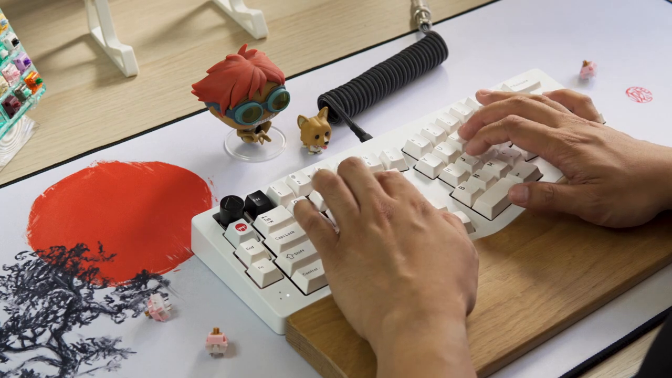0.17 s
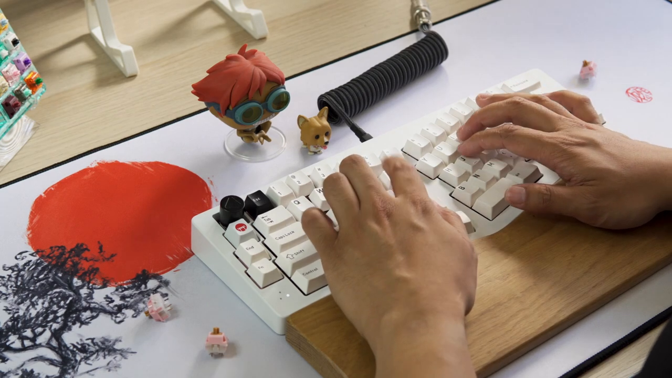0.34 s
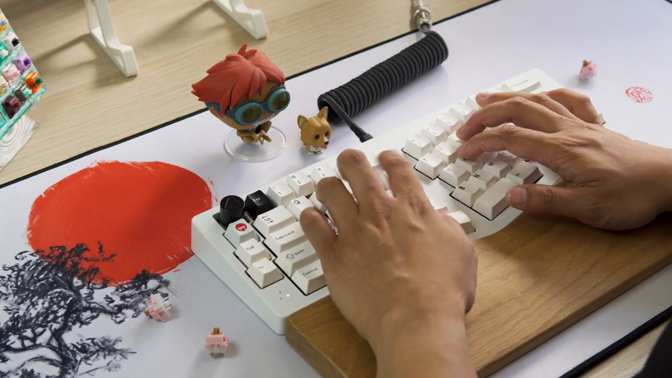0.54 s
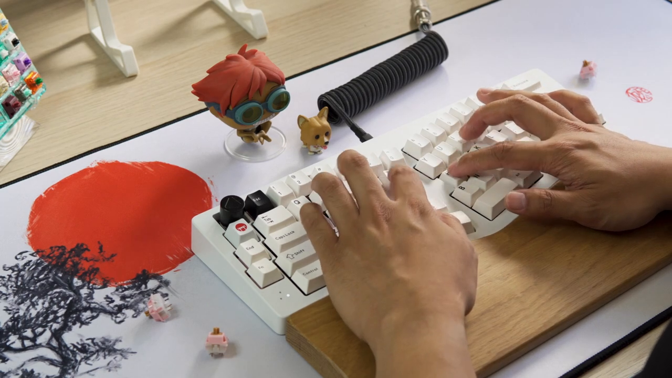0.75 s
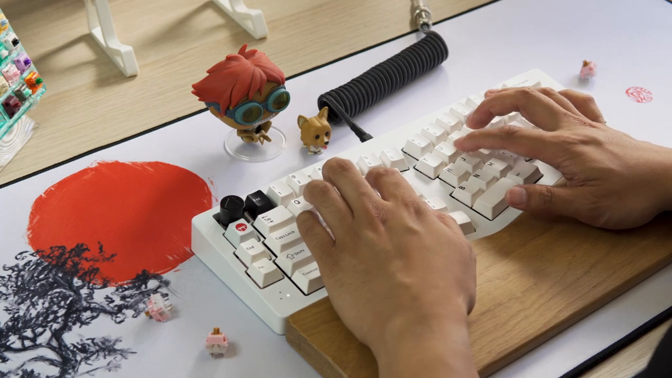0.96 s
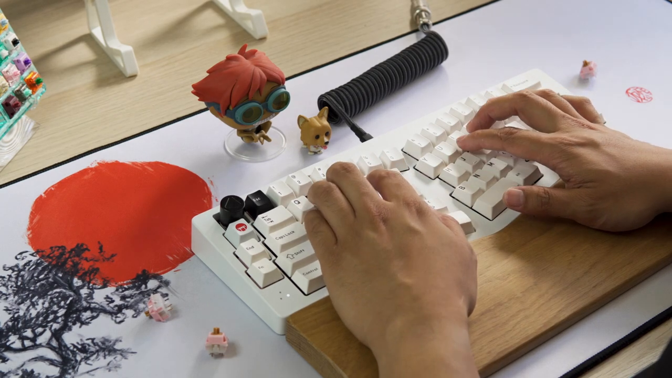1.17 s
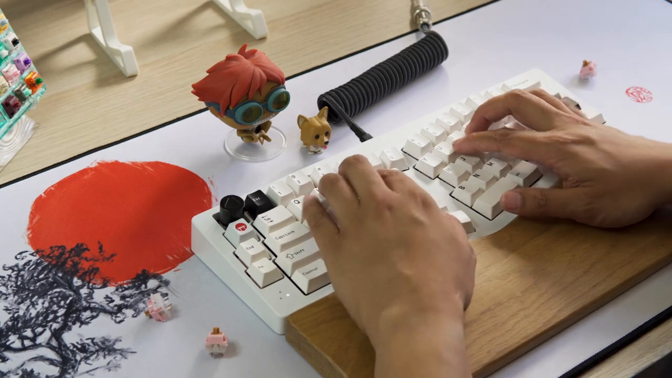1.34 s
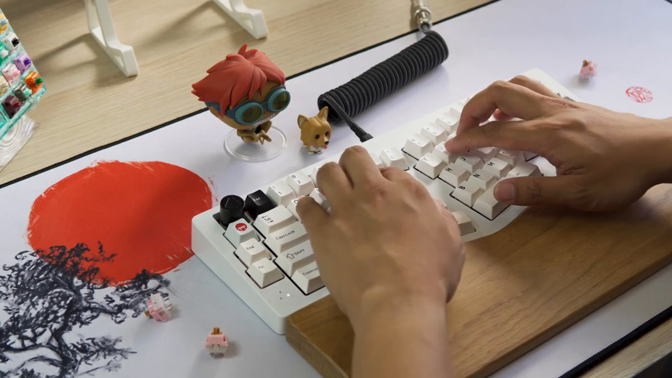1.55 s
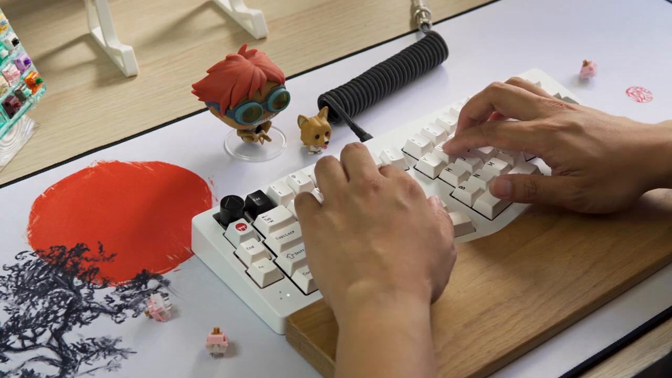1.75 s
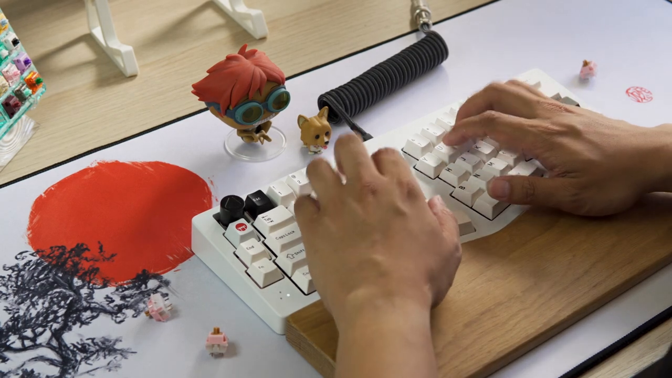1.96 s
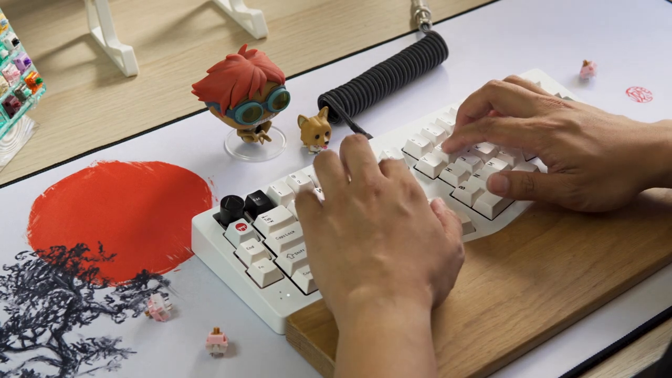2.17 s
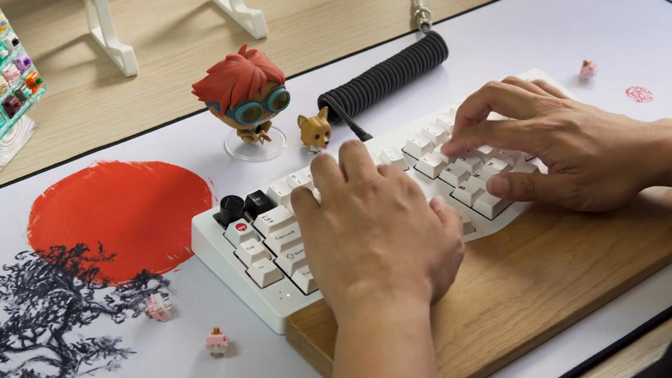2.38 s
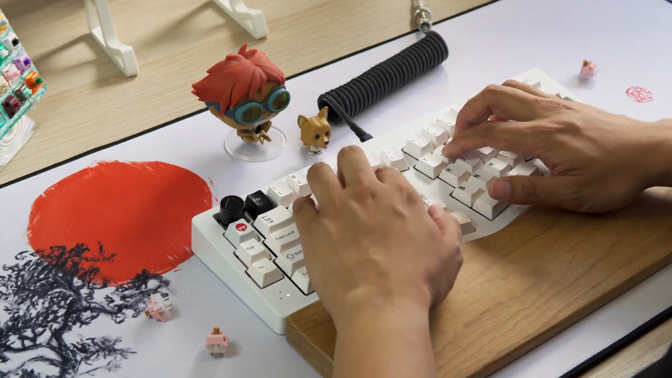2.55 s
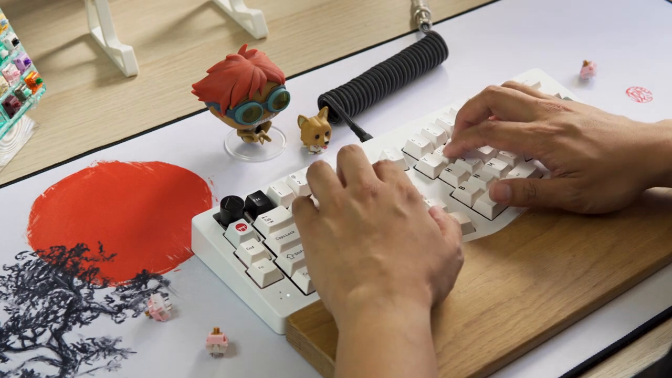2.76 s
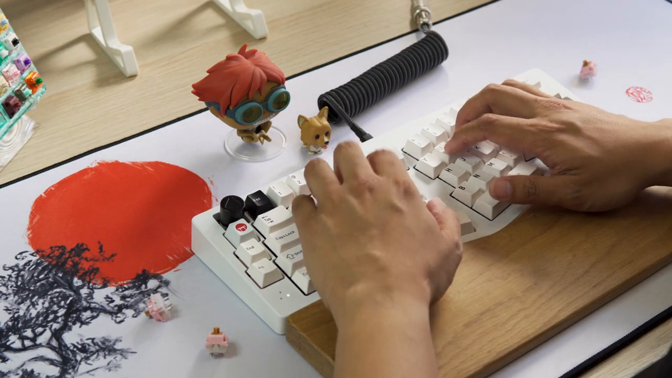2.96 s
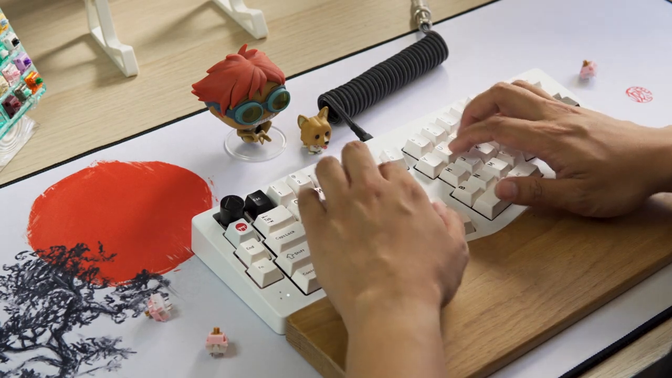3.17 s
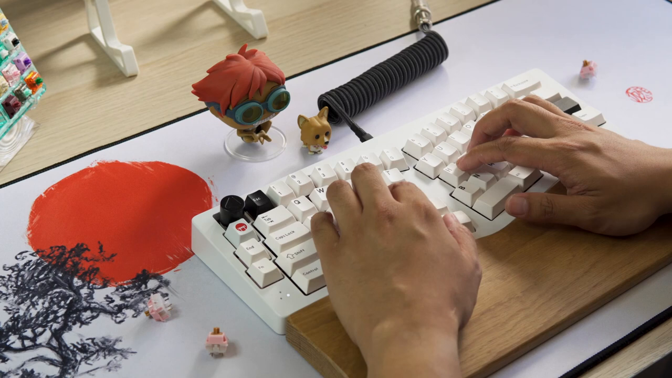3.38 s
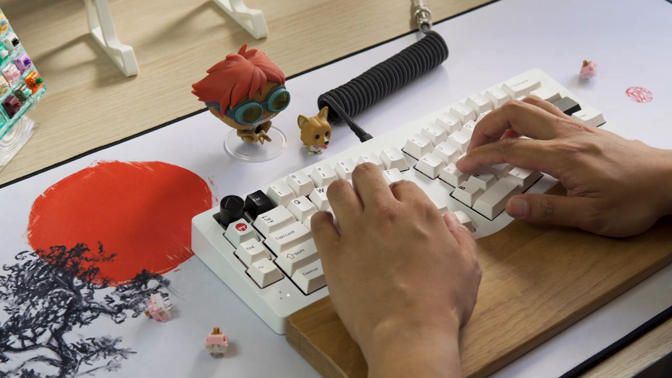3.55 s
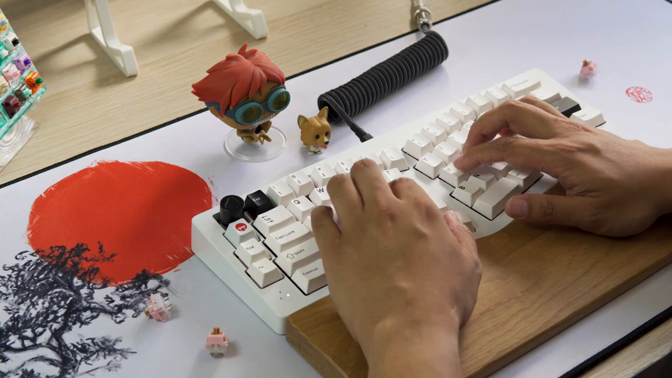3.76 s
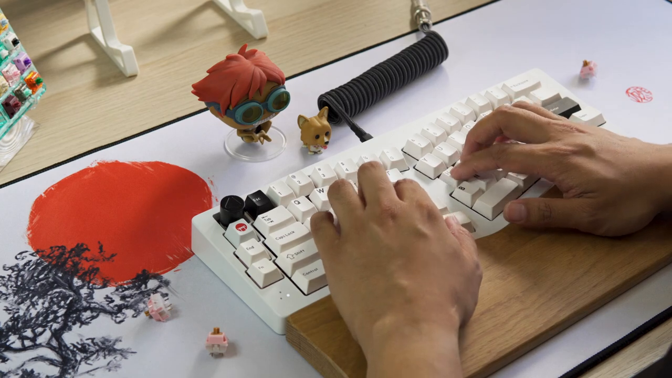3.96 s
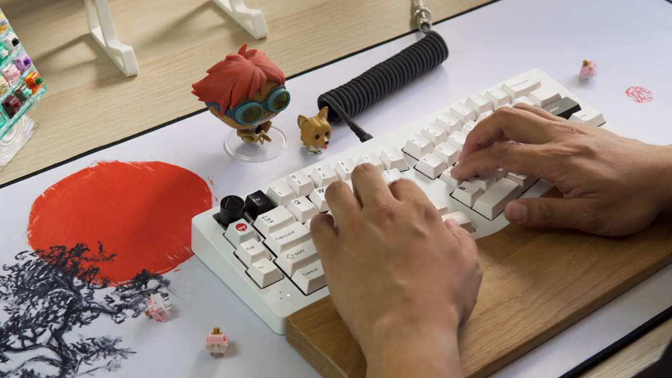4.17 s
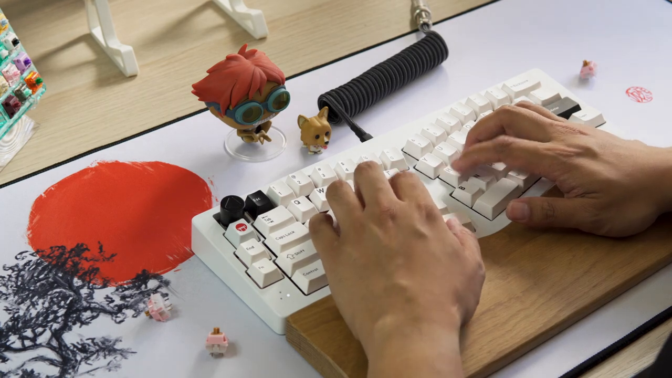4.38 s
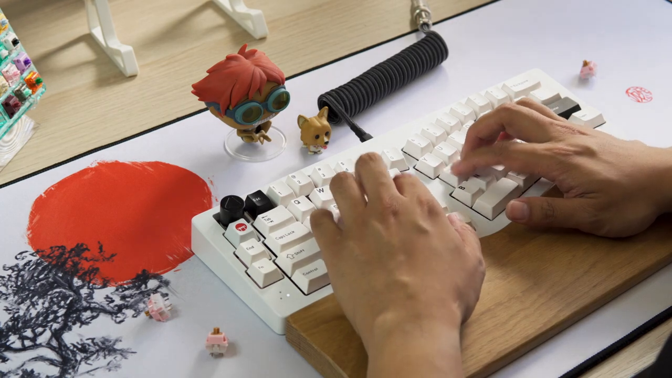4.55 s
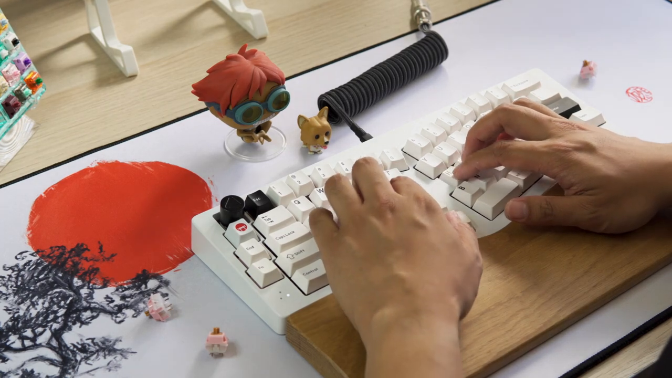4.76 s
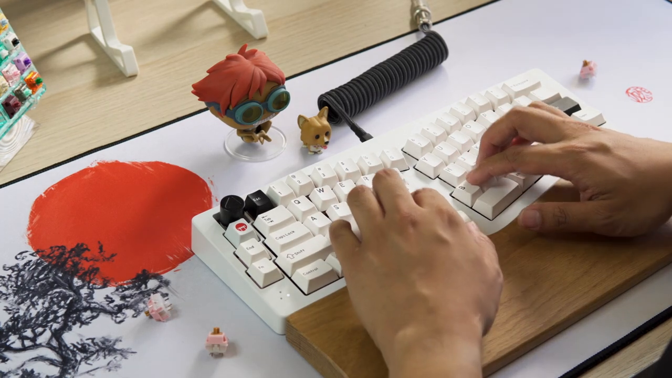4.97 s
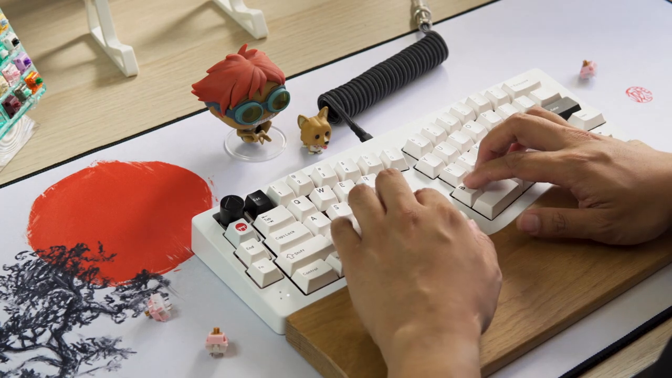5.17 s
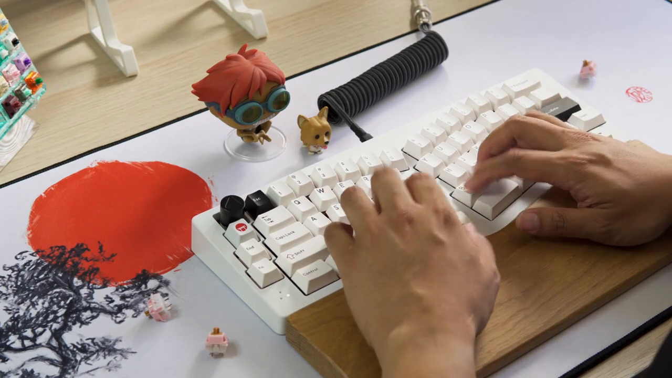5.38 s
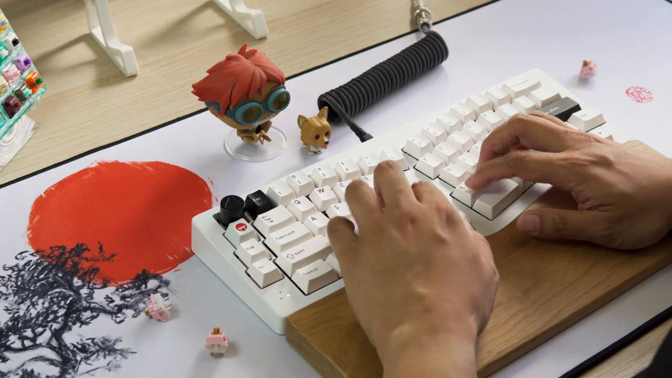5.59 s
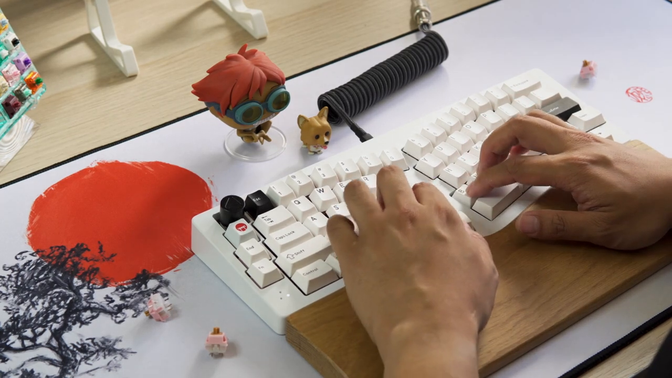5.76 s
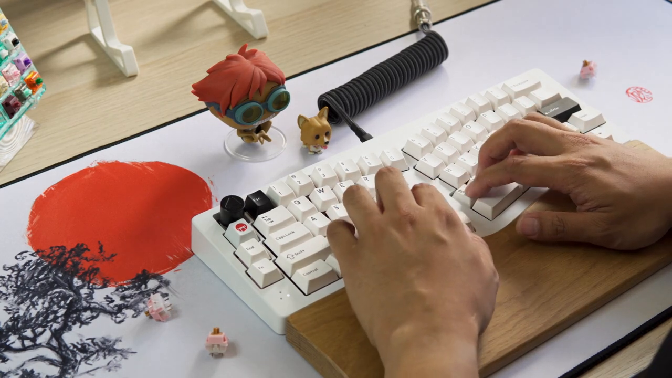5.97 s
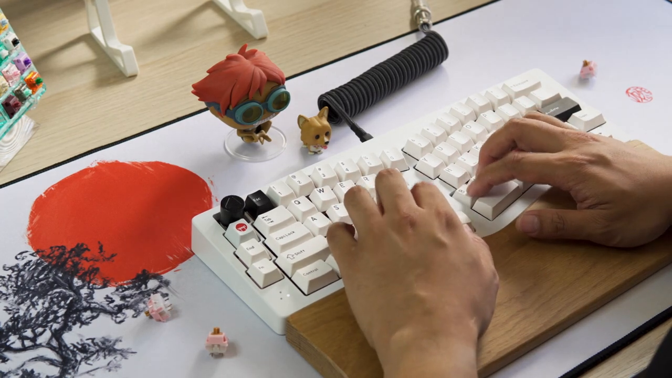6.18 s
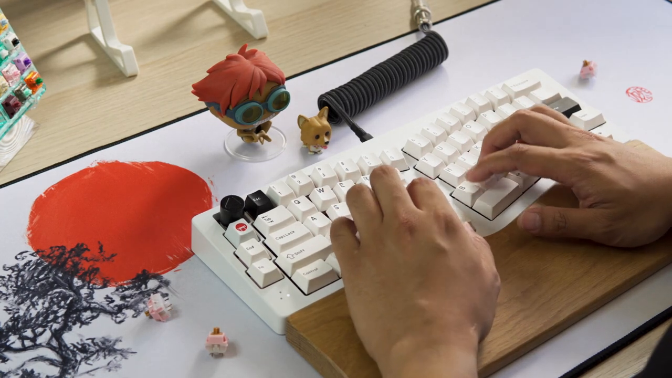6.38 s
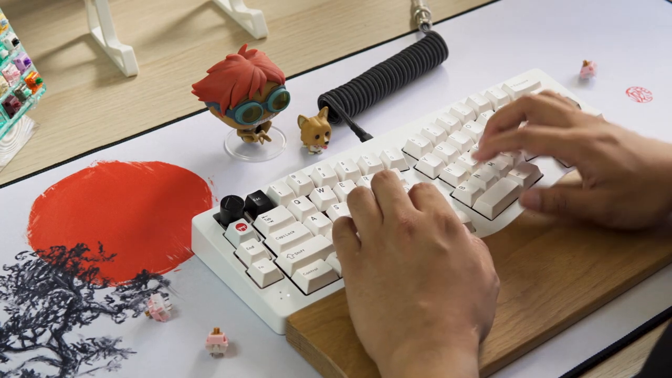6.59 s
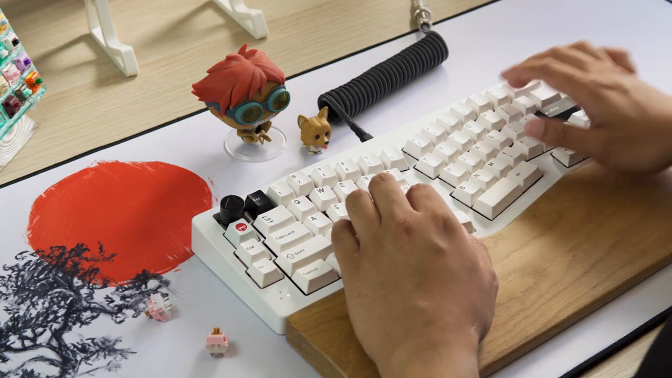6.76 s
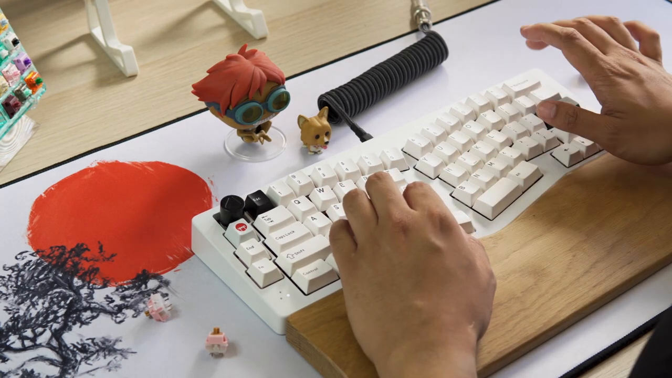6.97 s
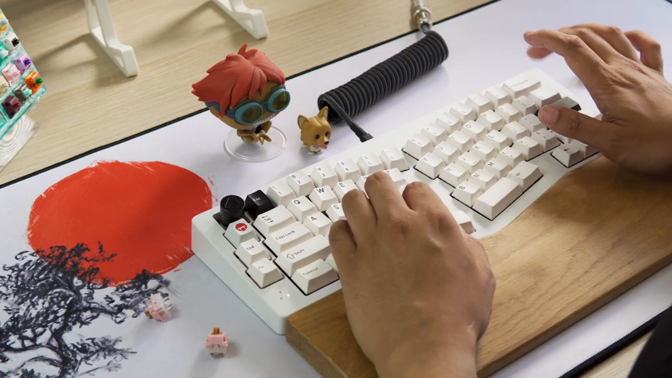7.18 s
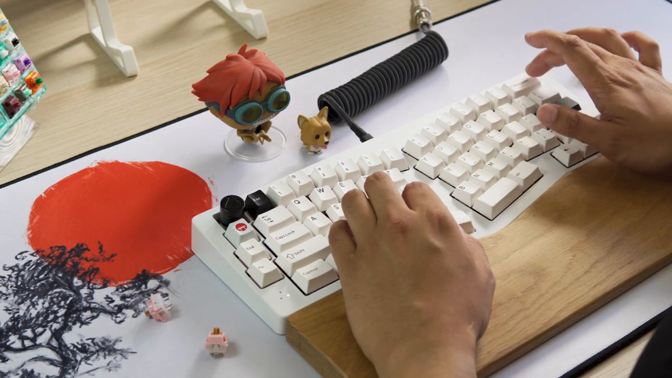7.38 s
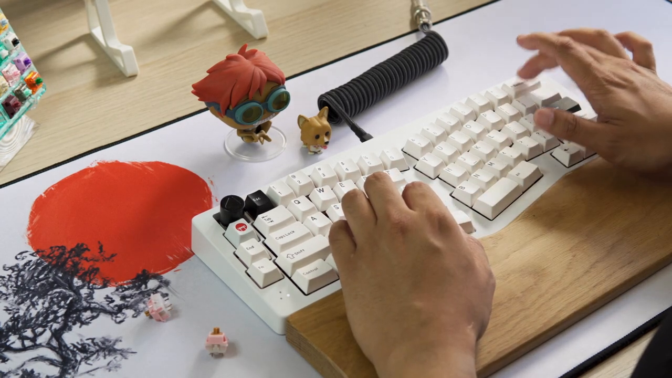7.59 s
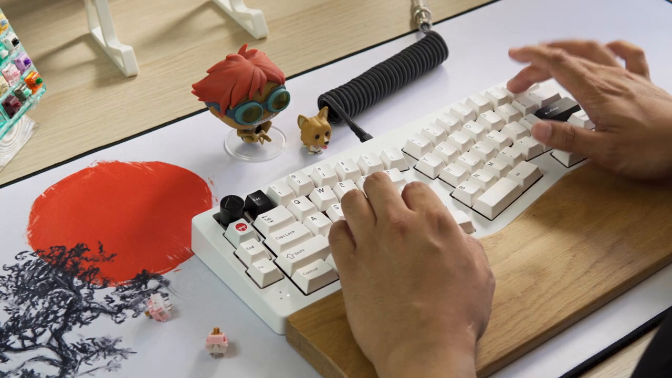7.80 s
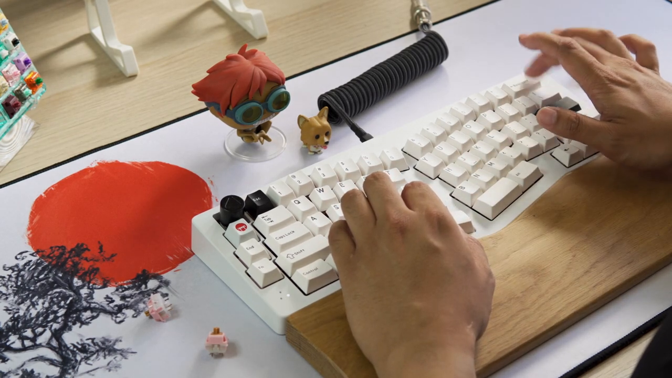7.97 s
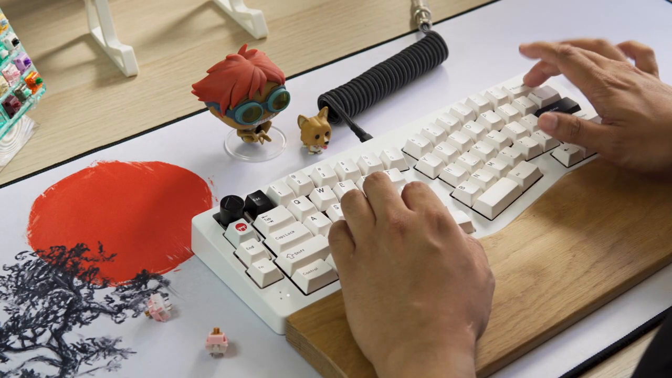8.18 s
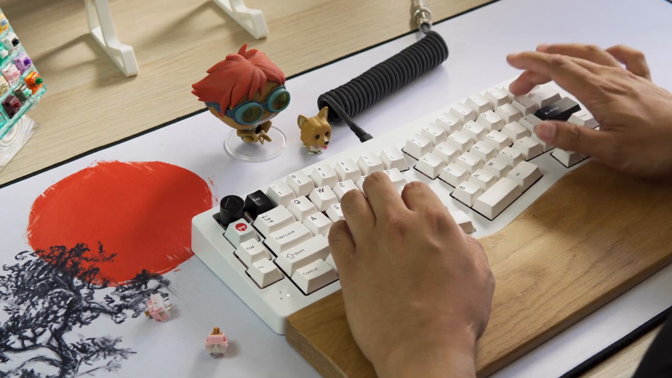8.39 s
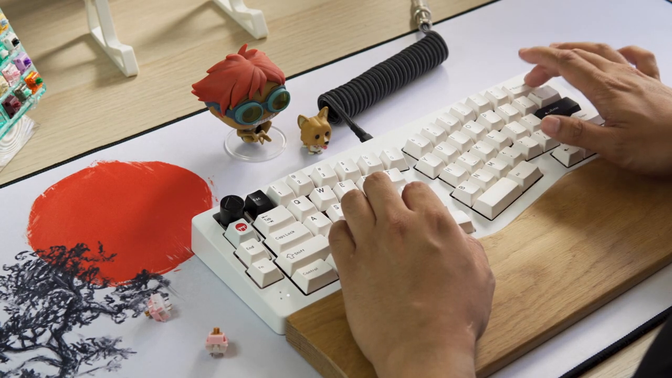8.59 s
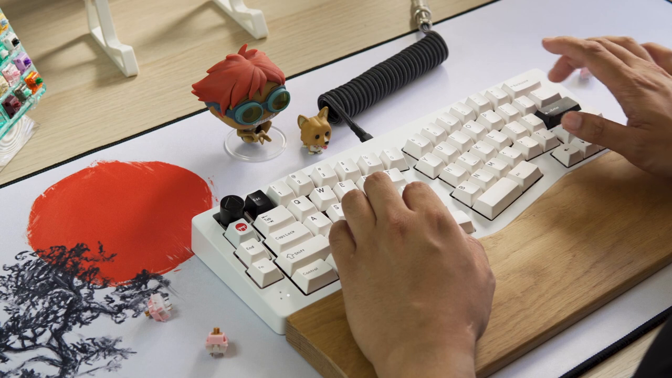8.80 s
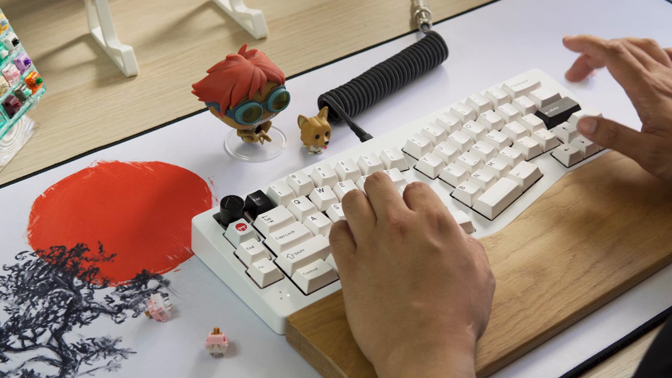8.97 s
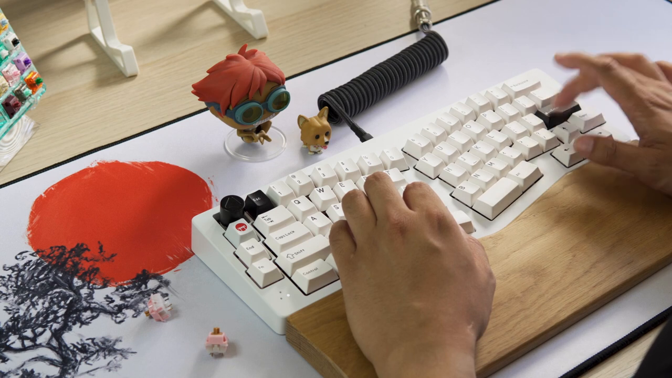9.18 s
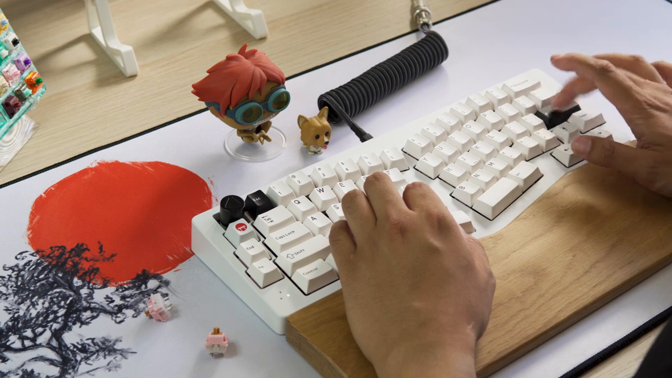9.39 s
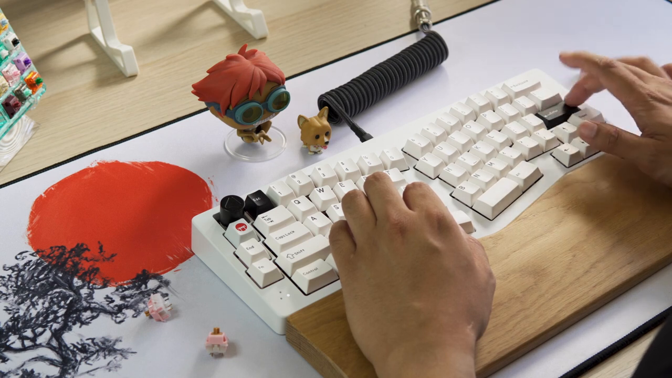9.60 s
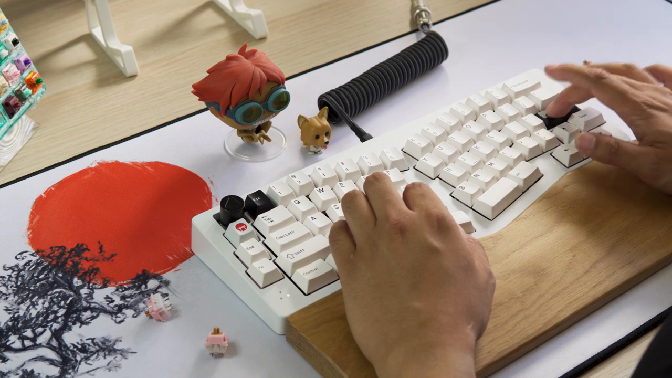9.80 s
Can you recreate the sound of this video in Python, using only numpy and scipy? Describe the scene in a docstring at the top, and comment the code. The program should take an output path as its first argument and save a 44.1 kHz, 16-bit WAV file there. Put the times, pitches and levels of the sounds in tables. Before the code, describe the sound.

Rapid typing on a mechanical keyboard in four dense bursts with short pauses, then evenly repeated single-key taps, heard close in a quiet small room.

```python
"""Fast typing in a small quiet room

One microphone close to a mechanical keyboard on a desk: four runs of letters, then repeated taps on a dull
and a bright editing key. Each key clacks going down and coming up, as damped resonances of keycap, plate
and switch, with a noise tail for the room. Firm strokes ring the low modes of the desk and sway its top,
a hand slides in a pause as swelling noise, and coloured noise with faint hum tones is the room air."""
import sys
import numpy as np
from scipy import signal
from scipy.fft import rfft, irfft
from scipy.io import wavfile
from scipy.ndimage import uniform_filter1d

SR = 44100
rng = np.random.default_rng(int(sys.argv[2]) if len(sys.argv) > 2 else 0)


def persist_wave(psi):
    """Save psi, clipped to +-1, as 16-bit WAV."""
    counts = np.round(np.clip(psi, -1, 1) * 32767).astype(np.int16)
    wavfile.write(sys.argv[1], SR, np.atleast_2d(counts).T)


N = 433944
TIME = np.arange(N) / SR


def amp(db):
    """Decibels to gain."""
    return np.exp(np.asarray(db) * np.log(10) / 20)


def add(track, s, sound):
    """Mix a sound into the track from time s, cutting what falls outside."""
    i = int(round(s * SR))
    sound = sound[max(-i, 0):max(N - i, 0)]
    track[max(i, 0):max(i, 0) + len(sound)] += sound


def coloured(x, points):
    """The sound weighted by a spectrum of (hz, level_db) points, joined over log frequency."""
    hz, db = np.transpose(points)
    f = np.maximum(np.fft.rfftfreq(len(x), 1 / SR), 1)
    gain = amp(np.interp(np.log(f), np.log(hz), db))
    return irfft(rfft(x) * gain, len(x))


def noise(points, size=N):
    """Noise of rms 1 with a spectrum of (hz, level_db) points."""
    y = coloured(rng.standard_normal(size), points)
    return y / y.std()


def unit(y):
    """The same sound with energy 1."""
    return y / np.sqrt(np.sum(y ** 2))


def ring(modes, scatter, size=11025):
    """Struck (hz, level_db, t60_s) modes as decaying sines, slightly detuned by the place of the blow."""
    t = np.arange(size) / SR
    hz, db, t60 = np.transpose(modes)[:, :, None]
    pitch = hz * (1 + scatter * rng.standard_normal(hz.shape))
    return np.sum(amp(db - 60 * t / t60) * np.sin(2 * np.pi * pitch * t), axis=0)


# spectrum of the still room air at the microphone: hz, level_db (relative)
AIR_SPECTRUM = [(15, -31), (25, -1), (59, -1.5), (87, -17.5), (123, -13), (206, -16), (242, -17.5),
                (545, -24.5), (887, -26), (1160, -32.5), (3820, -37.5), (4490, -43.5), (16000, -50)]
# faint hum of the room, before the gain hum_db: hz, level_db (rms)
HUM_TONES = [(120, -83.5), (140, -80.5), (241, -79.5), (603, -94), (3881, -96.5)]


def background(air_db, hum_db):
    """Still room air as coloured noise, with faint hum tones whose phases wander slightly."""
    hum = 0
    for hz, db in HUM_TONES:
        wander = np.cumsum(rng.standard_normal(N)) * .015  # radians
        hum = hum + np.sqrt(2) * amp(db) * np.sin(2 * np.pi * hz * TIME + wander)
    return amp(air_db) * noise(AIR_SPECTRUM) + amp(hum_db) * hum


# spectrum of a fingertip on a key: hz, level_db (relative)
FINGERTIP_SPECTRUM = [(500, -6.5), (1500, 0.5), (2600, 5), (4800, -6.5), (7000, -17), (10500, -11),
                      (15000, -45.5)]


def scuff(travel_s):
    """A fingertip lands and the stem slides down the switch: a short swell of coloured noise."""
    window = np.hanning(int(travel_s * SR))
    return unit(noise(FINGERTIP_SPECTRUM, size=len(window)) * window)


LEAD_IN_S = .001
# where plate, keycap, hard edge and switch ping lie in the spectrum: hz
PART_PITCHES = [1300, 2500, 4500, 10000]


def clack(modes, stroke, spread, blur, size=1024):
    """One blow on a key, after the lead-in: damped resonances, detuned by spread and widened by blur."""
    level_db, cap_hz, plate_db, edge_db, ping_db = stroke
    f = np.maximum(np.fft.rfftfreq(size, 1 / SR), 1)
    t = np.arange(size) / SR
    body = 0
    for k, (hz, width, db) in enumerate(modes):
        lag = 0
        if k == 2:
            hz = cap_hz
        elif hz < 6000:
            # each key sits on its own spot of the plate and rings a little differently
            hz = hz * (1 + spread * rng.standard_normal())
        else:
            # the highest modes keep the pitch they are given and start a random moment late, up to 0.7 ms
            lag = rng.uniform(0, .0007)
        mode = amp(db) / (1 + 1j * (f ** 2 - hz ** 2) / (f * width * blur)) ** 2
        # neighbouring modes move in opposite senses, which leaves notches between them
        body = body + (-1) ** k * mode * np.exp(-2j * np.pi * f * lag)
    # plastic on plastic adds a trace of broad crack
    crack = amp(-42) * rfft(unit(rng.standard_normal(size) * amp(-60 * t / .008)))
    colour_db = np.interp(np.log(f), np.log(PART_PITCHES), [plate_db, 0, edge_db, ping_db])
    sound = irfft((body + crack) * amp(level_db + colour_db))
    sound = np.roll(sound, int(LEAD_IN_S * SR))
    edge_fade = np.minimum(1, np.minimum(t, t[::-1]) / .0005)
    return sound * edge_fade


def chatter(sound, rattle_db):
    """The loose cap rattles on for a few milliseconds: the blow convolved with a decaying noise burst."""
    t = np.arange(len(sound)) / SR
    rattle = amp(rattle_db) * unit(rng.standard_normal(len(t)) * amp(-60 * t / .013))
    return sound + signal.fftconvolve(sound, rattle)[:len(t)]


def room(sound, decay):
    """Diffuse tail of one stroke; every key and hand position sends it along other paths."""
    return signal.fftconvolve(sound, decay * rng.standard_normal(len(decay)))


# the keyboard case under the plate: pitch_hz, level_db (relative), t60_s
CASE_RING = [(421, -2, 0.21), (507, -8, 0.11)]
# colour of the small room's tail: hz, level_db
ROOM_SPECTRUM = [(300, 1.7), (800, -2.7), (1400, 0.75), (2500, -0.35), (4000, -1), (7000, 1.1),
                 (10000, 0.9), (15000, -1)]


def keys(clacks, modes, spread, rattle_db, travel_s, gain_db, lead_db, touch_db, case_db, wet_db,
         room_t60, room_blur):
    """Each stroke: a scuff as the key travels, a light first contact, the clack, then case and room."""
    dry, wet, t = np.zeros(N), np.zeros(N), TIME[:SR // 4]
    decay = unit((1 - np.exp(-t / 0.0017)) * amp(-60 * t / room_t60))
    case = ring(CASE_RING, scatter=0)
    for s, *stroke in clacks:
        level_db, _, plate_db = stroke[:3]
        start = s - LEAD_IN_S
        sound = chatter(clack(modes, stroke, spread, blur=0.88), rattle_db)
        # the weight of the touch varies by 2 dB
        scuff_db = level_db + touch_db + 2 * rng.standard_normal()
        add(dry, s - travel_s, amp(scuff_db) * scuff(travel_s))
        add(dry, start - .0015, amp(lead_db) * sound)
        add(dry, start, sound)
        add(dry, s, amp(level_db + plate_db + case_db) * case)
        # the room hears the keyboard from all sides, so its peaks are blunter there
        add(wet, start, room(clack(modes, stroke, spread, blur=room_blur), decay))
    return amp(gain_db) * (dry + amp(wet_db) * coloured(wet, ROOM_SPECTRUM))


# a firm clack may jog a loose cap nearby, which ticks after 0.5 to 1.5 times the middle delay
JOG_ABOVE_DB, JOG_CHANCE, JOG_MID_DELAY_S = -0.5, .6, .007
JOG_LEVEL_DB, JOG_HARDNESS_DB = -14, 7
# key clacks, down and up, mostly of letter keys; the last is a fingertip landing before the dull taps:
# start_s, level_db (relative), keycap pitch_hz, plate_db, contact hardness_db
KEY_BLOWS = [(0.0096, -3.5, 2460, 5.5, 3.5), (0.045, 8, 2410, -8.5, 1.5), (0.11, -5.5, 2450, -8, -7.5),
             (0.1285, 6.5, 2260, -8.5, 0.5), (0.1389, -9, 2440, 8, -2), (0.1553, 4.5, 2630, -6, 4),
             (0.221, 6.5, 2480, -3.5, 5), (0.2567, -3.5, 2700, -5, 0.5), (0.3132, 1.5, 2670, -3.5, 6.5),
             (0.3204, -3, 2450, -5, -3), (0.3491, -4.0, 2720, -8, 3.5), (0.4271, -12, 2580, -1.5, 2),
             (0.4299, -18, 2516, -3, -2), (0.4667, 1, 2770, -15, 0), (0.4954, -0.5, 2220, -9.5, -1),
             (0.4996, -1, 2200, 2, -3), (0.5013, -3.5, 2240, 10, 1.5), (0.5578, 4, 2840, -4.5, 4.5),
             (0.5774, -12, 2270, -9.5, 5.5), (0.6149, -22, 2630, 20, 5.5), (0.6466, 4, 2530, -8.5, -6),
             (0.6874, 7.5, 2360, -5.5, 1), (0.7083, -22.5, 2330, -1.5, 1.5), (0.7197, -1, 2290, -9, -6.5),
             (0.8018, 1.5, 2430, -4, -7), (0.8117, -2, 2340, -6, -1.5), (0.9094, 0, 2160, -9, -12),
             (1.4366, -17.5, 2530, -10, -12), (1.4666, -19.5, 2650, -5, -8), (1.5284, -24.0, 2470, 13, 4),
             (1.7649, -16.5, 2620, -8, -8), (2.0045, -25.5, 2640, 0, 13), (2.0237, -23, 2790, 1, 2.5),
             (2.028, 6, 2560, -7.5, 1.5), (2.0423, -5.5, 2890, 6.5, 8), (2.0455, 6, 2358, -9, 2),
             (2.048, -6, 2967, -5.5, 5.5), (2.063, 6.5, 2435, -5, 7), (2.0893, -3, 2790, -1, 10.5),
             (2.1128, -1.5, 2560, -3.5, 5.5), (2.1354, -5, 2200, -4, -2), (2.1436, -12, 2530, 10, 7),
             (2.1617, -6.5, 2670, 2, -4), (2.1672, -4.5, 2490, -7, -2), (2.1948, -4, 2490, -5, 2.5),
             (2.2251, -2, 2420, 1.5, 3), (2.2802, 0.5, 2550, -2, 6), (2.2841, 3.5, 2303, -2, 0),
             (2.3056, -1, 2690, 2, 7.5), (2.3089, 1.5, 2538, -9, 6.5), (2.3308, -5, 2730, -3, 6.5),
             (2.351, -4.5, 2670, 0, 8), (2.3741, -8, 2460, -1, 4), (2.3926, -7, 2500, -1.5, -1),
             (2.3948, -12.5, 2624, 10, 4), (2.415, -8, 2750, -1.5, -1), (2.441, -8.5, 2190, -1.5, 6),
             (2.46, -11, 2410, 1, 0.5), (2.4672, -3.5, 2450, -4, -8.5), (2.5133, -10, 2793, -6, 3),
             (2.5163, 3.5, 2550, 1, 5), (2.524, 2, 2477, -7, 2), (2.5415, -0.5, 2950, -3, 12),
             (2.5469, -1.5, 2686, 0, -1), (2.5859, 0, 2700, 0, 8.5), (2.5983, -0.5, 2580, -1.5, 5),
             (2.632, -8.0, 2350, -5.5, -7), (2.651, -9.5, 2394, -3, 3), (2.6558, -0.5, 2270, -9, -6),
             (2.6609, -5, 2844, 0.5, 3), (2.6823, -14.5, 2380, 4, 7), (2.703, -1, 2698, -3, -4.5),
             (2.7098, -4, 2530, -2, -5), (2.7501, 5, 2620, -4.5, 2.5), (2.768, -1.5, 2900, 7.5, 7.5),
             (2.774, 4.5, 2410, -9.5, -1), (2.787, -9.0, 2940, 1.5, 15), (2.797, -3.5, 2730, -1, 7),
             (2.8102, -4.5, 2750, -1, 8), (2.8551, 2, 2527, -3, 7.5), (2.8628, -10, 2570, -2, 5.5),
             (2.8682, -1.5, 2490, -8, -8), (2.881, -3.5, 2790, 5, 1.5), (2.8963, -7, 2597, -4, -1),
             (2.9343, -12.5, 2520, -1.5, 4), (2.949, -7, 2250, 0, -3), (2.9681, -2, 2450, -6, 0),
             (2.9915, 4.5, 2550, -7.5, 2.5), (2.9976, 5, 2310, -5.5, -1), (3.0096, -5.5, 2624, 3, 7),
             (3.02, -8, 2864, -0.5, 8.5), (3.044, -3.5, 2620, -4, 4), (3.0683, -2.5, 2860, -0.5, 10),
             (3.0832, -2.5, 2520, -3, 5), (3.1372, -0.5, 2720, 2.5, -2), (3.1597, -5, 2330, -3, -3),
             (3.1638, -6, 2470, -2, -6), (3.1676, -4.0, 2260, -4, -1), (3.1783, -9.5, 2530, 3, 4),
             (3.194, -4.5, 2450, -8, -2), (3.2065, -6, 2510, -2, -2.5), (3.9173, -0.5, 2720, 2, 8.5),
             (3.9304, 2.5, 2290, -6.5, 1.5), (3.9404, 8, 2410, -7, -4), (3.9537, -4.0, 2500, -8, -0.5),
             (3.9597, 6.5, 2400, -7.5, 0), (4.004, 2, 2574, -2.5, 1), (4.039, 4.5, 2480, -6.5, 0),
             (4.051, -3, 2390, -8, -12.5), (4.0687, -8, 2370, -8, -2.5), (4.0843, 0.5, 2580, -8, -6),
             (4.1143, 3, 2350, -8, -8), (4.1307, -4.5, 2390, -5, -3), (4.1843, 0, 2833, 1, 5),
             (4.19, 8, 2540, -6, -14), (4.1975, 1.5, 2570, -8, 7.5), (4.2057, 0.5, 2533, -9, 2.5),
             (4.2412, 4, 2200, -9, -7.5), (4.2537, -3.5, 2540, -2, 7), (4.2749, -6.5, 2730, 4.5, 7),
             (4.3058, -3, 2450, -7, -12), (4.317, -4, 2450, -2, -3), (4.3235, -5.5, 2440, -7, 1),
             (4.3346, 1.5, 2420, -11, -4.5), (4.372, 7.0, 2160, -11, -9), (4.4036, -1, 2680, 1, 6),
             (4.4381, 0.5, 2570, -5, 2.5), (4.4581, 5.5, 2480, -7.5, -5), (4.461, -1, 2560, -4.5, 1.5),
             (4.4804, -2, 2420, -12.5, -15), (4.4913, -0.5, 2260, -7, -7), (4.509, 2.5, 2500, -3, 2),
             (4.5244, -9, 2560, 3, 0.5), (4.5397, -4.5, 2350, -2.5, 1), (4.5523, -4, 2470, -11, -9),
             (4.5644, -5, 2450, -7, -12), (4.5746, -3.5, 2480, -6.5, -2), (4.5801, 0.5, 2600, -11, -4),
             (4.616, -1, 2414, -5.5, -2), (4.6187, 1.5, 2340, -8.5, -8), (4.6608, 0, 2790, 1.5, 8.5),
             (4.6834, 4.5, 2530, -3, 0.5), (4.6941, 8.5, 2480, -13, -4), (4.698, 4, 2530, -8.5, 2.5),
             (4.7204, -1.5, 2550, -4, -2), (4.7269, 0, 2290, -7, -8), (4.7917, -11, 2440, 4.5, 0.5),
             (4.8307, -1.5, 2490, -6.5, -3.5), (4.8414, 8.5, 2620, -10.5, -19),
             (4.8628, -3, 2250, -3.5, -6), (4.8729, -7.5, 2290, 0, -1.5), (5.401, -29, 2600, 5.5, 4),
             (5.4312, 5.0, 2460, -0.5, -5), (5.4472, 1.5, 2600, -16, 3.5), (5.458, 3.5, 2400, -6, -6),
             (5.464, 2.5, 2500, 1.5, 7), (5.4811, -0.5, 2370, -3.5, -3), (5.5248, -2.5, 2350, 3, 5),
             (5.558, -3.5, 2350, 0, -5), (5.5594, -5.5, 2590, 0, 5), (5.5924, -11.5, 2460, 14, 8),
             (5.6061, -8.5, 2540, -0.5, 3.5), (5.636, 3, 2330, -5, -9.5), (5.6642, -16, 2260, 4, 5),
             (5.6947, 2.5, 2630, -5.5, -1.5), (5.6997, -3.5, 2510, -3, -16), (5.705, 2, 2610, -4.5, 2),
             (5.7128, 2.5, 2440, -3, 5.5), (5.7426, -2.5, 2380, -2, -3), (5.7774, -5, 2490, 7.5, 10.5),
             (5.7825, -1, 2400, 1.5, -1), (5.7988, -5, 2370, -3.5, -1), (5.817, -6, 2510, 5.5, 5.5),
             (5.8591, -10.5, 2560, -1, 2), (5.883, 2, 2300, -7.5, -4), (5.8872, -7, 2200, -7, -15),
             (5.9047, -12.5, 2260, 6.5, 1), (5.9285, 2, 2280, -3, -7.5), (5.9422, -3.5, 2680, 3, 3),
             (5.9574, 2.5, 2600, -11.5, 1), (5.961, -2, 2540, 4, 7), (5.9952, 0, 2650, 1.5, 6),
             (6.019, -6, 2590, 2.5, 3), (6.0519, -11.5, 2190, 3, -1), (6.0628, -7, 2520, 4, -6),
             (6.0721, -5.5, 2470, -1, -5.5), (6.0785, 1.5, 2300, -8.5, -7), (6.1125, -9, 2580, -1, -2),
             (6.133, 1.5, 2230, -5.5, -7), (6.1463, -11.5, 2400, 7, 4), (6.1801, 3.5, 2300, -3, -4),
             (6.1954, 0, 2430, 0, 4), (6.2044, -7, 2740, 1, 7), (6.2251, -1, 2670, -4.5, 2.5),
             (6.2349, -4.5, 2550, -1, 3), (6.242, 6.5, 2330, -6, -1), (6.2584, -9, 2350, 3, 5),
             (6.317, -8.5, 2610, 1, -5), (6.3633, -6, 2300, 2, -7), (6.37, -16.5, 2460, 9.5, 11),
             (6.3902, -0.5, 2260, -4.5, -2.5), (6.3984, -9, 2320, 6, 0), (6.4295, -2.5, 2350, -4.5, -5),
             (6.5618, -20.5, 2530, -4, -11), (7.2866, -28.5, 2300, 5, 14)]
# a harder contact brings out the hard edge (first row) and the switch ping (second):
# level_db at hardness 0, slope (dB per dB of hardness)
HARDNESS_COLOUR = [(-4.5, 1.09), (-4, 0.6)]


def run_strokes():
    """Key clacks coloured by their hardness, with the ticks of caps that they jog."""
    base_db, slope = np.transpose(HARDNESS_COLOUR)
    jog_colour = base_db + slope * JOG_HARDNESS_DB
    strokes, chance = [], rng.random((len(KEY_BLOWS), 2))
    for (s, level_db, cap_hz, plate_db, hard_db), (luck, wait) in zip(KEY_BLOWS, chance):
        strokes.append((s, level_db, cap_hz, plate_db, *(base_db + slope * hard_db)))
        if level_db > JOG_ABOVE_DB and luck < JOG_CHANCE:
            tick_s = s + JOG_MID_DELAY_S * (.5 + wait)
            strokes.append((tick_s, JOG_LEVEL_DB, cap_hz, 0, *jog_colour))
    return strokes


# resonances shared by the four runs; each stroke brings its own pitch for the second, the keycap:
# pitch_hz, width_hz (before blur), level_db (relative)
LETTER_RESONANCES = [(1373, 926, -10.5), (2550, 1000, 1.5), (3483, 1850, -5.5), (4530, 2580, -11),
                     (8900, 3600, -26.5)]
# each run of letters has its own low knock and switch ping, levels relative, widths before blur:
# start_s, knock pitch_hz, knock level_db, ping pitch_hz, ping width_hz, ping level_db
RUNS = [(0, 853, -21.5, 10200, 1395, -14.5), (1.9, 1020, -25.5, 10280, 1400, -15),
        (3.7, 925, -23.5, 10050, 1200, -14.5), (5.2, 821, -21, 10420, 1503, -16.5)]
KNOCK_WIDTH_HZ = 480  # before blur


def letter_keys():
    """Four runs of letters: short key travel, with the knock and ping of each run around the shared modes."""
    strokes = run_strokes()
    later_starts = [run[0] for run in RUNS[1:]]
    run_of = np.searchsorted(later_starts, [stroke[0] for stroke in strokes])
    out = np.zeros(N)
    for k, (_, knock_hz, knock_db, *ping) in enumerate(RUNS):
        in_run = [stroke for stroke, r in zip(strokes, run_of) if r == k]
        modes = [(knock_hz, KNOCK_WIDTH_HZ, knock_db), *LETTER_RESONANCES, ping]
        out += keys(in_run, modes, spread=0.028, rattle_db=-4.5, travel_s=.006, gain_db=-0.94,
                    lead_db=-19.0, touch_db=-33.5, case_db=-68.5, wet_db=-9.5, room_t60=.29, room_blur=0.91)
    return out


# firm letter strokes that push the desk, levels before the gains below:
# start_s, thud level_db, following sway level_db
DESK_PUSHES = [(0.043, -55, -59), (0.157, -59, -68.5), (0.312, -57.5, -56.5), (0.43, -59.5, -66.5),
               (0.687, -56, -60), (2.065, -52, -61.5), (2.284, -54.5, -47.5), (2.598, -51.5, -54),
               (2.811, -52, -58.5), (2.992, -59.5, -53), (3.07, -53.5, -60.5), (3.94, -50, -56),
               (4.242, -50, -52), (4.458, -49, -52.5), (4.695, -48.5, -49), (4.842, -64, -68),
               (5.433, -53, -51.5), (5.524, -53, -54), (5.705, -47.5, -51), (5.778, -53, -58),
               (5.958, -47.5, -50.5), (6.243, -49, -55)]
# the desk and the keyboard case on it: pitch_hz, level_db (relative), t60_s
DESK_RING = [(33, -2, 0.27), (62.9, -11, .13), (83.5, 1, 0.33), (109, -14, 0.017), (185, -15, 0.12)]
# every tap on the two editing keys bottoms out with the same weight; its sway is set relative to its thud
TAP_THUD_DB, TAP_SWAY_DB = -55, -8.5
# each push sets the desk top swaying; resting hands keep a little sway going
SWAY_RISE_S, SWAY_T60_S, SWAY_REST_DB = 0.051, 1.2, -67.5


def desk(ring_gain_db, bump_gain_db, bump_t60, sway_gain_db):
    """Firm strokes bump the desk and ring its low modes; the top sways on its legs after each push."""
    out, t, slow = np.zeros(N), TIME[:SR // 4], TIME[:2 * SR]
    sway_power = np.full(N, amp(SWAY_REST_DB) ** 2)
    rocking = (1 - np.exp(-slow / SWAY_RISE_S)) * amp(sway_gain_db - 60 * slow / SWAY_T60_S)
    bump_shape = (1 - np.exp(-t / 0.0044)) * amp(bump_gain_db - 60 * t / bump_t60)
    taps = DULL_KEY_TAPS + BRIGHT_KEY_TAPS
    tap_pushes = [(tap[0], TAP_THUD_DB, TAP_THUD_DB + TAP_SWAY_DB) for tap in taps]
    for s, thud_db, rock_db in list(DESK_PUSHES) + tap_pushes:
        bump = noise([(30, -19.0), (70, 2.5), (115, -3.0), (160, -9.5), (260, -25.5), (600, -48.5)],
                     size=len(t))
        add(out, s, amp(thud_db) * bump * bump_shape)
        add(out, s, amp(thud_db + ring_gain_db) * ring(DESK_RING, scatter=0.02))
        add(sway_power, s, (amp(rock_db) * rocking) ** 2)
    sway = noise([(15, -29.5), (26, -11.0), (32, -7), (40, -15.5), (60, -19.5), (150, -43.0), (400, -76.5)])
    return out + sway * np.sqrt(sway_power)


def swell(peak_s, peak_db, rise, fall):
    """Gain that climbs to a peak and dies away, each at a steady rate in dB per s."""
    return amp(peak_db - np.maximum(rise * (peak_s - TIME), fall * (TIME - peak_s)))


# spectra of the skin's hiss and of the palm's rub: hz, level_db (relative)
SKIN_SPECTRUM = [(500, -19), (1500, -3), (3000, -1.5), (5000, -7), (8000, -15), (15000, -18)]
RUB_SPECTRUM = [(60, -0.5), (130, 4.5), (250, -7), (600, -14), (1200, -13.5), (2200, -30.5), (5000, -51)]
# swells of the hiss and of the rub, before their gains: peak level_db, rise (dB per s), fall (dB per s)
HISS_SWELL = (-65.5, 100, 140)
RUB_SWELL = (-56, 130, 150)
HISS_PEAK_S, RUB_PEAK_S = 1.49, 1.55


def hand(hiss_gain_db, rub_gain_db):
    """Skin slides over the wrist rest: a slightly uneven hiss over a dull rub."""
    grip = uniform_filter1d(rng.standard_normal(N), size=300)
    grip_db = 1.2 * grip / grip.std()
    hiss = noise(SKIN_SPECTRUM) * amp(hiss_gain_db) * swell(HISS_PEAK_S, *HISS_SWELL)
    rub = noise(RUB_SPECTRUM) * amp(rub_gain_db) * swell(RUB_PEAK_S, *RUB_SWELL)
    return (hiss + rub) * amp(grip_db)


def tap_strokes(taps, touch):
    """Each tap clacks twice: the key hits bottom, then its spring throws it back against the top."""
    down, up = touch
    strokes = []
    for press_s, release_s, press_db, release_db in taps:
        strokes.append((press_s, press_db, *down))
        strokes.append((release_s, release_db, *up))
    return strokes


# repeated taps on the dull key, levels relative: press_s, release_s, press level_db, release level_db
DULL_KEY_TAPS = [(7.309, 7.409, -9, -27), (7.4895, 7.5873, -2.5, -14), (7.6765, 7.7637, 0.5, -16),
                 (7.858, 7.9464, 2, -13), (8.0463, 8.1383, -1.5, -12), (8.2247, 8.3038, -2, -11),
                 (8.3969, 8.4844, 0.5, -14), (8.6098, 8.7023, -4.5, -12.5)]
# colour of a tap, going down (first row) and springing back (second):
# keycap pitch_hz, plate_db, hard edge_db, switch ping_db
DULL_KEY_TOUCH = [(2165, 1, 1, 0), (2300, 6, 2, 1.5)]
# its resonances, the keycap third (pitch from the touch):
# pitch_hz, width_hz (before blur), level_db (relative)
DULL_RESONANCES = [(980, 1950, -12), (1300, 910, -3), (2200, 535, 4), (3203, 450, -2.5), (4260, 970, -6.5),
                   (4830, 6600, -24.5), (9150, 3900, -24.5)]


def dull_key():
    """Taps on an editing key with longer travel, whose soft releases stay well below the presses."""
    return keys(tap_strokes(DULL_KEY_TAPS, DULL_KEY_TOUCH), DULL_RESONANCES, spread=0.0086, rattle_db=-4.5,
                travel_s=0.014, gain_db=-1.5, lead_db=-24, touch_db=-31.5, case_db=-59.5, wet_db=-12.5,
                room_t60=0.27, room_blur=1.6)


# repeated taps on the bright key, levels relative: press_s, release_s, press level_db, release level_db
BRIGHT_KEY_TAPS = [(9.0791, 9.155, 7.8, -6.5), (9.2572, 9.3394, 5.5, -3.5), (9.4647, 9.5374, 0.65, -6.5),
                   (9.647, 9.7246, 3.9, -6)]
# colour of a tap, going down (first row) and springing back (second):
# keycap pitch_hz, plate_db, hard edge_db, switch ping_db
BRIGHT_KEY_TOUCH = [(2190, 1, 3, -7), (2440, 7.5, 4.5, -2)]
# its resonances, the keycap third (pitch from the touch):
# pitch_hz, width_hz (before blur), level_db (relative)
BRIGHT_RESONANCES = [(1064, 500, -15), (1775, 940, -6.5), (2350, 1110, 0.5), (3610, 1600, -16.5),
                     (5330, 1060, -8), (7760, 5700, -22), (11700, 5415, -24)]


def bright_key():
    """Taps on a second editing key, with resonances that reach higher and a fainter ring of the case."""
    return keys(tap_strokes(BRIGHT_KEY_TAPS, BRIGHT_KEY_TOUCH), BRIGHT_RESONANCES, spread=0.015,
                rattle_db=-6.5, travel_s=0.014, gain_db=0.5, lead_db=-21, touch_db=-35.0, case_db=-71.5,
                wet_db=-12.5, room_t60=0.32, room_blur=1.07)


def scene():
    """Room air, keys, desk and hand at one close microphone."""
    air = background(air_db=-67, hum_db=0.5)
    letters = letter_keys()
    thuds = desk(ring_gain_db=0.5, bump_gain_db=-0.5, bump_t60=0.28, sway_gain_db=9)
    slide = hand(hiss_gain_db=-1.5, rub_gain_db=1.0)
    return (air + letters + thuds + slide + dull_key() + bright_key())[None]


def record(dry):
    """The recorder cuts the very top: a steep low-pass at 16 kHz."""
    return signal.sosfilt(signal.ellip(8, .2, 70, 16000, fs=SR, output="sos"), dry)


dry = scene()
out = record(dry)
persist_wave(out)
```